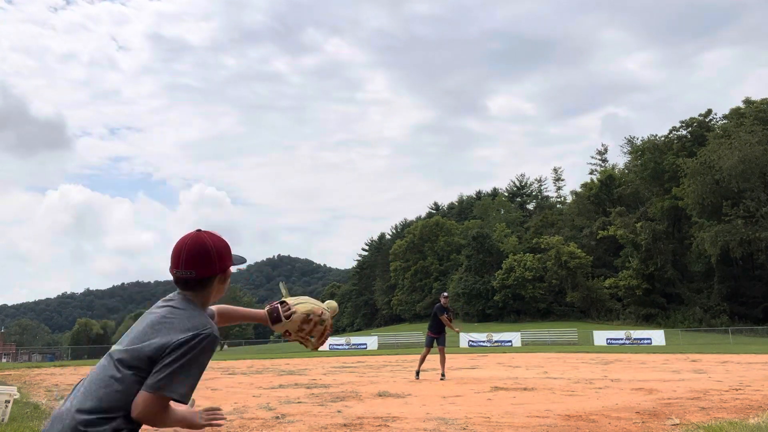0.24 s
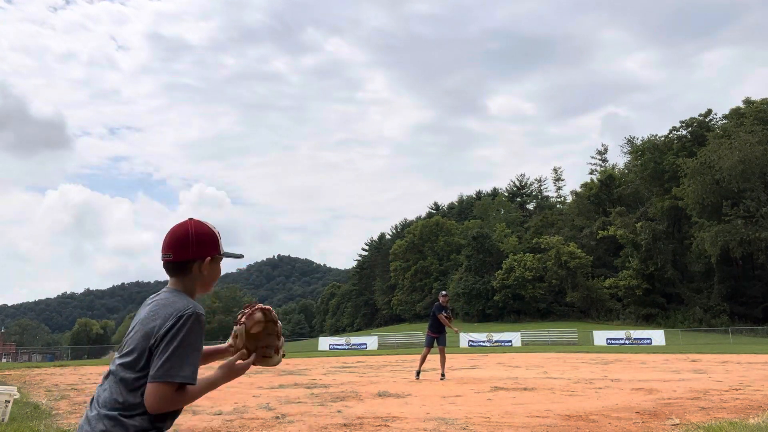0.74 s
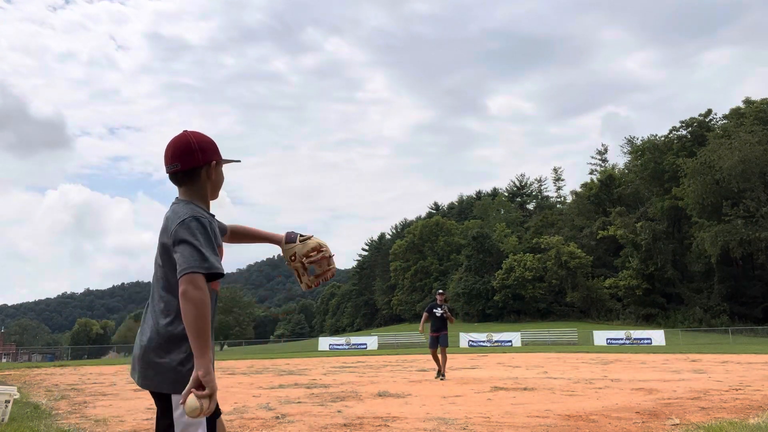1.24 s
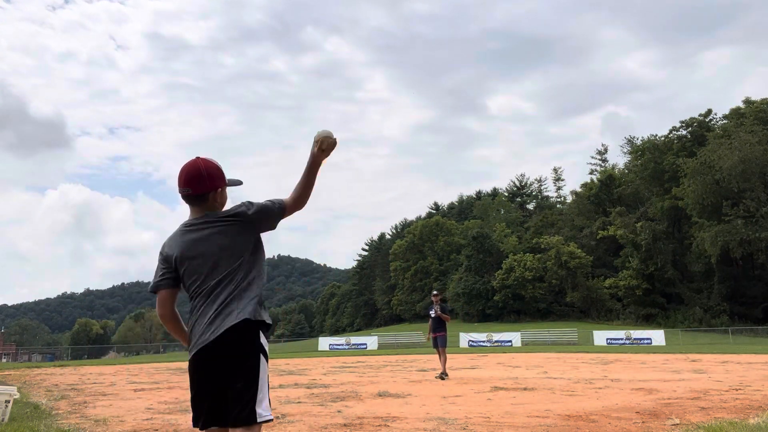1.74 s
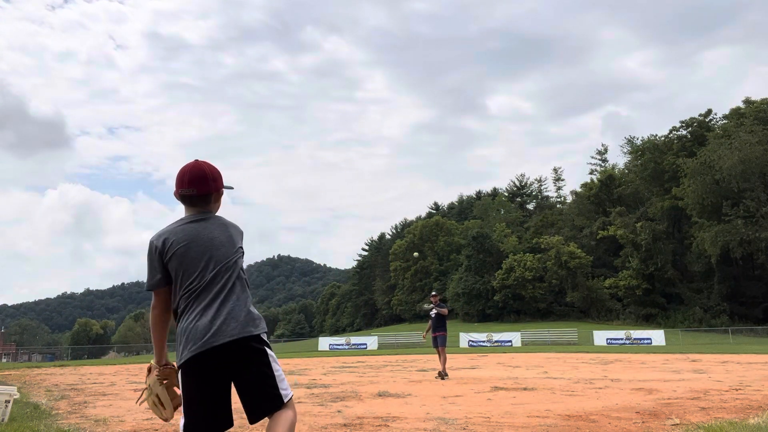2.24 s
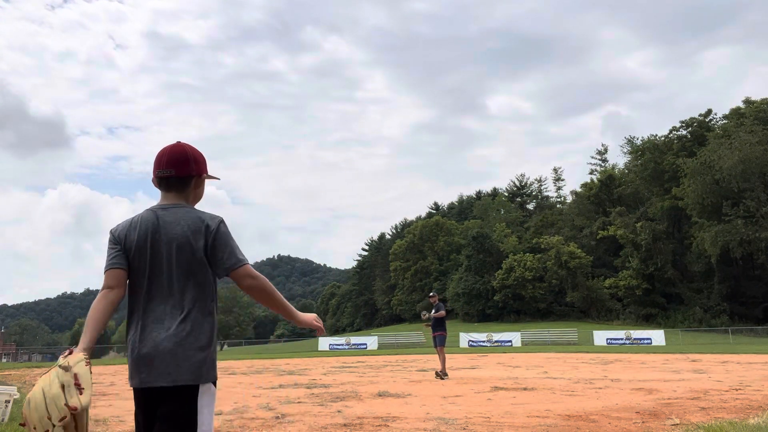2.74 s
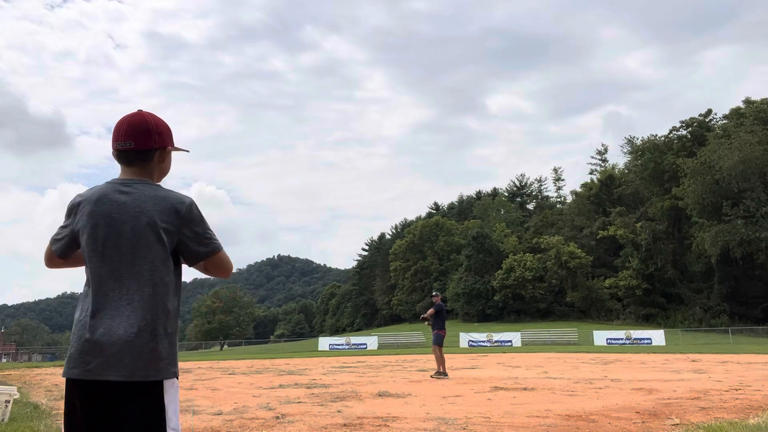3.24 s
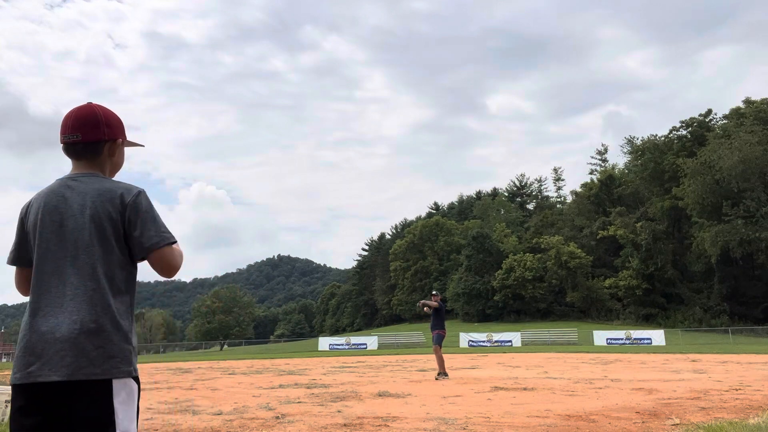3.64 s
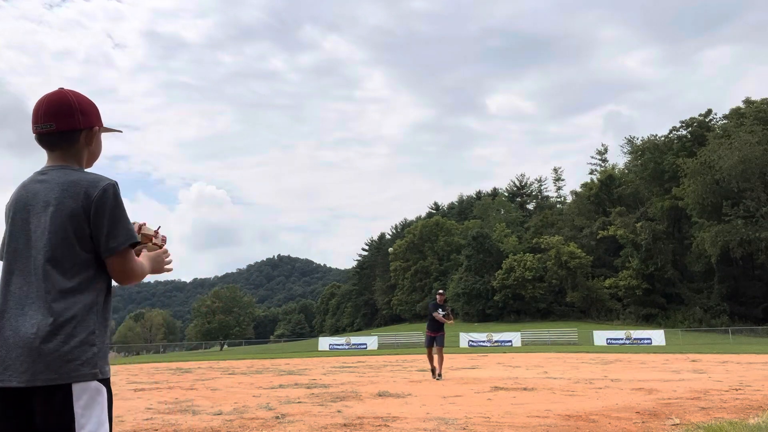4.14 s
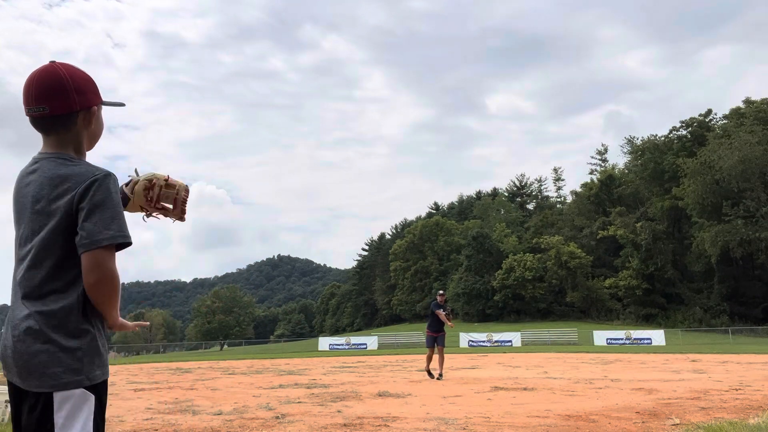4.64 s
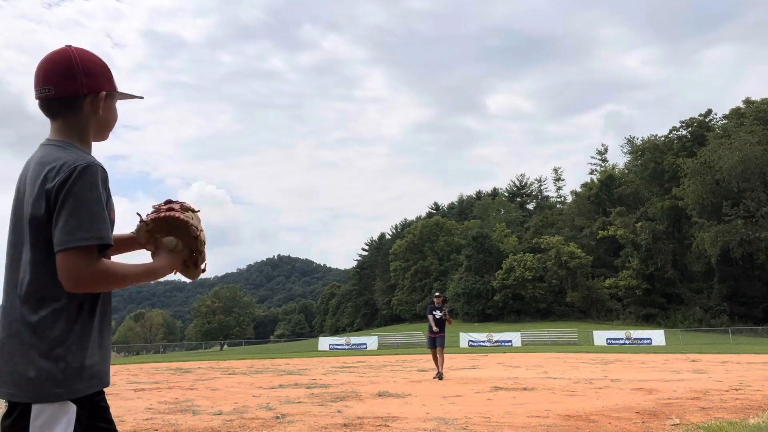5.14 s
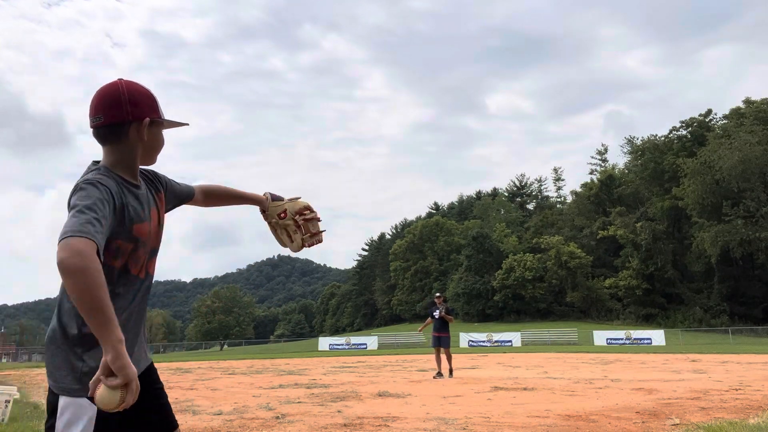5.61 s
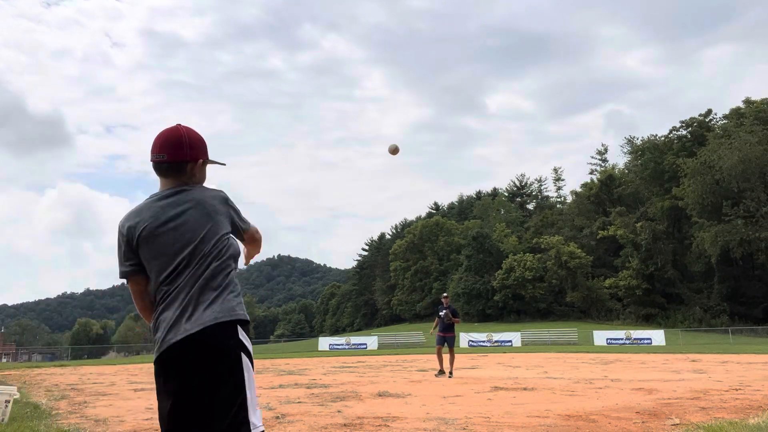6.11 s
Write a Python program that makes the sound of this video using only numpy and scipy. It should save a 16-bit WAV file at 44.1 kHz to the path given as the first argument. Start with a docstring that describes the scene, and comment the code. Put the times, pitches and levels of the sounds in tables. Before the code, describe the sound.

Close stereo pickup beside a player catching and throwing on an infield. A thick double-edged glove pop comes almost at once, then rustling, pebbly ticks and scuffs as the ball is taken out and thrown. A dry, slightly thinner pop follows, then quiet, then another sharp smack and more leather fumbling. Behind it are a low wavering motor hum, soft air hiss, a faint insect buzz, bird notes and a passing thin engine whine.

```python
"""Game of catch on a dirt infield

Three pops of a ball in a leather glove, with shoes scuffing, small knocks and leather creaking around them.
Each pop layers ringing leather, a sliding pocket note, a low thud, a noisy crack and a grainy flutter.
A far motor hums in wavering overtones and a small engine whines for a while above its faint idle.
Gliding tones make the birds, swelling noise an insect, and coloured noise the rumbling, hissing air.
The sound cuts out briefly twice near the start."""
import sys
import numpy as np
from scipy import signal
from scipy.fft import rfft, irfft, next_fast_len
from scipy.io import wavfile

SR = 44100
rng = np.random.default_rng(int(sys.argv[2]) if len(sys.argv) > 2 else 0)


def master_out(mix):
    """Clip the mix to full scale and print it as 16-bit PCM to the path in sys.argv[1]."""
    frames = np.transpose(np.atleast_2d(mix))
    ceiling = np.clip(frames, -1, 1)
    pcm = np.round(ceiling * 32767).astype(np.int16)
    wavfile.write(sys.argv[1], SR, pcm)


N = 280958
TIME = np.arange(N) / SR

# ringing modes of the near glove's leather, before each catch's tilt and damping: mode_hz, level_db, t60_s
NEAR_GLOVE = [(1040, 6.5, 0.01), (1295, 2.5, .014), (1717, -1, 0.011), (1980, -5, 0.011),
              (2717, -15, 0.022), (3220, -18, 0.033), (3750, -15, 0.016), (5240, -26.5, 0.0088),
              (6780, -17, 0.0087)]
# the same for the far glove: mode_hz, level_db, t60_s
FAR_GLOVE = [(1170, 0, 0.01), (1320, 0.5, 0.011), (1662, -11, 0.0079), (1890, -6, 0.014),
             (2040, -23, 0.017), (3500, -5.5, 0.0043), (3950, -18, 0.0065), (5750, -15, 0.0076),
             (7360, -21, 0.01)]
# spectrum of crunching dirt: pitch_hz, relative level_db per Hz
DIRT = [(120, -13), (300, 6.5), (550, 4), (1200, 4.5), (2000, -1), (3200, -15), (5000, -22.5), (8000, -41),
        (10000, -69), (15000, -56.5)]
# spectrum of fine grit: pitch_hz, relative level_db per Hz
GRIT = [(500, 14), (1100, 5.5), (2000, -2.5), (3500, 3), (5000, -4.5), (8000, -3), (10500, -34),
        (14500, -19.5), (16500, -27.5)]
# scuffs of shoes, cloth and leather: start_s, length_s, body_db, grit_db
SCUFFS = [(0.141, 0.047, -40, -50.5), (0.173, 0.039, -42.5, -53), (0.209, 0.026, -43, -59),
          (0.818, 0.03, -53, -50), (0.87, 0.058, -47.5, -61), (0.914, 0.035, -38, -44),
          (0.956, 0.018, -40.5, -51), (0.972, 0.024, -41.5, -49), (1.007, 0.017, -51, -54),
          (1.027, 0.048, -40, -56), (1.04, 0.016, -50, -52), (1.061, 0.06, -48.5, -47.5),
          (1.185, 0.03, -50, -61), (1.39, 0.04, -39.5, -48), (1.592, 0.11, -49, -44.5),
          (2.584, 0.1, -48.5, -55), (2.71, 0.045, -47, -61), (3.206, 0.037, -48.5, -65),
          (4.221, 0.13, -53, -81), (4.445, .1, -49.5, -63), (4.63, 0.11, -50.5, -55),
          (4.673, 0.013, -46, -53), (4.817, 0.13, -51.5, -58), (5.704, 0.033, -45.5, -53.5),
          (5.78, 0.089, -50, -53.5), (5.824, 0.013, -45, -55), (5.887, 0.088, -47, -54)]


def from_db(db):
    """Decibels to gain."""
    return 10 ** (np.asarray(db) / 20)


def rms_one(x):
    """Scale to unit power."""
    return x / np.sqrt(np.mean(x ** 2) + 1e-20)


def in_time(rows):
    """Interpolate each curve column at every sample."""
    s, *columns = np.transpose(rows)
    return [np.interp(TIME, s, column) for column in columns]


def colour(x, spectrum):
    """Give a steady signal a spectrum, rolled off beyond both ends; rms 1."""
    hz, db = np.transpose(spectrum)
    bins = np.maximum(np.fft.rfftfreq(len(x), 1 / SR), 1)
    beyond = np.minimum(bins / hz[0], 1) ** 2 * np.minimum(hz[-1] / bins, 1) ** 2
    gain = from_db(np.interp(np.log(bins), np.log(hz), db))
    return rms_one(irfft(rfft(x) * beyond * gain, len(x)))


def noise(spectrum):
    """Smooth coloured noise."""
    return colour(rng.standard_normal(next_fast_len(N)), spectrum)[:N]


def drift(rate_hz):
    """Chance curve with spread 1, taking a new random value rate_hz times a second."""
    knots = rng.standard_normal(16384)
    return rms_one(np.interp(TIME * rate_hz, np.arange(len(knots)), knots))


def grains(spectrum, per_s, spread_db):
    """Dense clicks of uneven size, coloured."""
    size = next_fast_len(N)
    clicks = (rng.random(size) < per_s / SR) * rng.standard_normal(size)
    uneven = from_db(spread_db * np.minimum(rng.exponential(1, size), 3))
    return colour(clicks * uneven, spectrum)[:N]


def burst(s, rise, fall, grip=1):
    """Samples of the next quarter second, time since the blow and its envelope; more grip ends it more abruptly."""
    span = slice(int(s * SR), min(int(s * SR) + SR // 4, N))
    t = np.maximum(TIME[span] - s, 0)
    return span, t, (1 - np.exp(-t / rise)) * np.exp(-(t / fall) ** grip)


def stereo(mid, side=0, pan_db=0):
    """Left and right from the shared part and the opposed part; positive pan leans left."""
    sign = np.array([[1], [-1]])
    return (mid + sign * side) * from_db(sign * pan_db / 2)


def widened(spectrum):
    """Spectrum of the opposed part of a near noise: the treble is widest."""
    # tilt added to the opposed part: pitch_hz, tilt_db
    width = [(200, -17), (1200, -11.5), (2400, -6.5), (4400, -3.5), (8000, 3), (15000, 10.5)]
    width_hz, width_db = np.transpose(width)
    return [(hz, db + np.interp(np.log(hz), np.log(width_hz), width_db)) for hz, db in spectrum]


def motor(waver_db=1.0, overtone_waver_db=1.0, wander_hz=0.518, lag_s=0.00095):
    """Only the lowest firing orders carry this far; the air makes them waver, and they reach the right ear later."""
    # firing rate: time_s, pitch_hz
    pitch = [(0.0, 63.5), (0.19, 65.5), (1.17, 65), (2.38, 62), (4.93, 60), (6.37, 59.5)]
    # level of the firing tone: time_s, level_db
    level = [(0.0, -39), (0.03, -42.5), (0.3, -42), (0.8, -43.5), (1.13, -39), (1.24, -58), (1.35, -44.5),
             (1.67, -41.5), (1.97, -51), (2.0, -38), (2.4, -37.5), (2.59, -31.5), (3.9, -33.5),
             (4.19, -39.5), (4.7, -37.5), (5.24, -32.5), (5.31, -37.5), (5.39, -33), (5.78, -29),
             (6.1, -38.5), (6.3, -40.5), (6.37, -44)]
    # common level of the overtones: time_s, level_db
    overtone_level = [(0, -64), (1.05, -51), (1.25, -64), (2.4, -50), (2.6, -47.5), (3.3, -43),
                      (3.9, -48.5), (4.9, -46), (5.7, -41), (6.37, -54.5)]
    # overtones: multiple of the firing rate, level_db against the common level
    orders = [(2, -1), (3, -10.5), (4, -16)]
    (hz,), (level_db,), (overtones_db,) = in_time(pitch), in_time(level), in_time(overtone_level)
    ear_delay = hz * lag_s * np.array([[0], [1]])
    turn = 2 * np.pi * (np.cumsum(hz + wander_hz * drift(11)) / SR - ear_delay)
    hum = np.sin(turn) * from_db(level_db + waver_db * drift(12))
    for k, db in orders:
        hum = hum + from_db(overtones_db + db + overtone_waver_db * drift(6)) * np.sin(k * turn)
    return stereo(np.sqrt(2) * hum, pan_db=-1.9)  # root two turns each sine's level into rms


def air(mid_db=-46.5, side_db=-51, breeze_db=1.0, wind_db=-54, gust_db=4):
    """Low rumble and a soft hiss with a narrow bright band; light gusts buffet each ear with its own noise."""
    # part alike at both ears: pitch_hz, relative level_db per Hz
    mid = [(25, 0), (55, 13), (105, 16), (170, 5.5), (330, -9.5), (800, -6.5), (1800, -11.5), (3000, -21),
           (4600, -23.5), (5500, -23), (6200, -25), (7100, -7), (8200, -27.5), (9500, -59)]
    # part opposed between the ears: pitch_hz, relative level_db per Hz
    side = [(25, -3.5), (70, 18.5), (170, 1), (380, -10), (850, 7.5), (1800, -3), (3000, -15), (4600, -14),
            (5500, -22.5), (6200, -15), (7100, 0), (8200, -17), (9500, -31), (15500, -37.5)]
    hiss = stereo(from_db(mid_db + breeze_db * drift(8.4)) * noise(mid), from_db(side_db) * noise(side))
    wind_spectrum = [(35, -10.5), (60, -0.5), (110, -11.0), (250, -13.5)]
    wind = np.array([noise(wind_spectrum) for _ in range(2)])
    return hiss + from_db(wind_db + gust_db * drift(9.9)) * wind


def whine(wander_hz=0.8, wander_per_rev=0.845, fade_db=4.0, rasp_db=-1):
    """A small far engine idles faintly, swells, dulls as it recedes and sinks back; its lines waver on the way."""
    # revving of the engine: time_s, pitch_hz
    revs = [(3.2, 429.3), (3.6, 429.6), (4.0, 435.4), (4.3, 443.4), (4.6, 446.2), (5.4, 434)]
    # sounding lines: multiple of the pitch, level_db at the start of the swell
    orders = [(2, -1), (3, -7), (4, -13.5), (5, -17.5), (6, -9)]
    # rough noise of the engine: pitch_hz, relative level_db per Hz
    rasp = [(500, -30), (850, 12.5), (1400, -5.5), (2600, -12), (4000, -36.5)]
    start_s, attack_s, end_s, release_s = 3.14, 0.15, 4.99, 0.22
    full_db, idle_db, recede_db_per_s = -57, -69.5, 1.5
    dulling_db_per_s = 2.5  # for each step up the overtones
    hz, = in_time(revs)
    running = np.maximum(TIME - start_s, 0)
    throttle = np.clip(running / attack_s, 0, 1) * np.exp(-np.maximum(TIME - end_s, 0) / release_s)
    # it runs less evenly at higher revs
    wander = (wander_hz + wander_per_rev * (hz - hz.min())) * drift(22)
    turn = 2 * np.pi * np.cumsum(hz + wander) / SR
    lines = np.zeros(N)
    for k, db in orders:
        dulling_db = dulling_db_per_s * (k - 2.5) * running
        lines += from_db(db - dulling_db + fade_db * drift(12)) * np.sin(k * turn)
    ears = np.array([lines + from_db(rasp_db) * noise(rasp) for _ in range(2)])
    swell_db = (full_db - recede_db_per_s * running - idle_db) * throttle
    return from_db(idle_db + swell_db) * ears


def coarse_grains(count=3, snap_db=-12):
    """Every firm scuff sets off a few small contacts at chance moments: rows shaped like the knocks in ticks()."""
    level_db, spread_db, low_hz, high_hz, length_s = -1, 7, 724, 3020, 0.0022
    firm_db = -53  # scuffs no louder than this shift no coarse grains
    rows = []
    for s, length, body_db, _ in SCUFFS:
        for when, size, pitch in rng.random((count, 3)):
            hz = low_hz * (high_hz / low_hz) ** pitch
            if body_db > firm_db:
                start = s + length * (0.092 + 0.73 * when)
                db = body_db + level_db + spread_db * (2 * size - 1)
                rows.append((start, db, hz, length_s, snap_db))
    return rows


def ticks(rise_s=0.00032, wobble=0.2):
    """Each small contact rings briefly at an unsteady pitch, with a dry snap."""
    # clearest knocks of leather, laces and pebbles: start_s, level_db, pitch_hz, length_s,
    # snap_db against the knock
    knocks = [(.101, -36.5, 595, 0.0047, -3), (.126, -33.5, 326, 0.0073, -13),
              (.152, -30, 550, 0.0035, -15), (.175, -30.5, 1210, 0.003, -16),
              (.19, -29.5, 1160, 0.0043, -5), (.214, -35, 440, .004, -15), (.875, -42, 806, 0.0042, -15),
              (.922, -33, 1810, .005, -10), (.941, -31, 620, 0.0071, -10), (.96, -35, 718, 0.0072, -12),
              (1.031, -30, 796, 0.0052, -14), (1.045, -26.5, 867, 0.0079, -12),
              (1.048, -29, 480, 0.0056, -11), (1.06, -30, 574, 0.0047, -6),
              (1.213, -36.5, 1140, 0.0032, -14), (1.399, -37, 1425, 0.0023, -1),
              (1.428, -40, 3040, 0.0018, -1), (1.51, -36, 1260, 0.0028, -14),
              (1.556, -30, 1090, 0.0018, -10), (1.762, -39, 1460, 0.0018, 3),
              (1.789, -32.5, 1550, 0.0017, -13), (2.5219, -14.5, 1350, 0.0023, 1),
              (2.958, -43.5, 1020, 0.0041, -11.5), (3.149, -44, 490, 0.0087, -12),
              (4.6365, -28.5, 750, 0.0028, -2), (4.854, -37.5, 1700, 0.0009, 0),
              (4.8815, -29.5, 1265, 0.0011, 0), (5.699, -33, 337, 0.0028, -9), (5.72, -36, 1050, 0.005, -8),
              (5.787, -39, 1800, 0.0036, -5), (5.828, -33, 1004, 0.006, -13),
              (5.902, -39, 1320, 0.0026, -5), (5.925, -47, 1460, 0.0059, -8), (5.945, -45, 1500, .0012, -2)]
    out = np.zeros((2, N))
    snap = stereo(0.26 * noise(DIRT) + 0.5 * noise(GRIT), 0.35 * noise(widened(GRIT)))
    unsteady = 1 + wobble * drift(1500)
    for s, db, hz, length, snap_db in list(knocks) + coarse_grains():
        span, t, fade = burst(s, rise_s, length)
        knock = np.sin(2 * np.pi * hz * np.cumsum(unsteady[span]) / SR)
        out[:, span] += from_db(db) * fade * (knock + from_db(snap_db) * snap[:, span])
    return out


def scuffs(body_width_db=-9, grit_width_db=-2, uneven_db=2.0):
    """Rubbing strokes swell quickly and fade: a dull crunch with fine grit on top."""
    body, grit = np.zeros(N), np.zeros(N)
    for s, length, body_db, grit_db in SCUFFS:
        span, t, stroke = burst(s, 0.15 * length, length, grip=1.6)
        body[span] += from_db(body_db) * stroke
        grit[span] += from_db(grit_db) * stroke
    crunch = stereo(grains(DIRT, 3000, 2.6), from_db(body_width_db) * grains(widened(DIRT), 5000, 3))
    sand = stereo(grains(GRIT, 3500, 0.78), from_db(grit_width_db) * grains(widened(GRIT), 3500, 2.5))
    return (body * crunch + grit * sand) * from_db(uneven_db * drift(130))


def insect(buzz_db=-70, first_s=0.26, every_s=1.52, length_s=1):
    """A narrow band of treble noise swells and fades at an even pace."""
    # spectrum of the buzz: pitch_hz, relative level_db per Hz
    buzz = [(4400, -24), (5200, 1), (5650, 0), (6100, -8), (6800, -35)]
    swell = np.sin(np.pi * np.clip((TIME - first_s) % every_s / length_s, 0, 1))
    return from_db(buzz_db) * swell * stereo(0.57 * noise(buzz), noise(buzz))


def catches(slap_rise_s=0.00074, thud_hz=100, thud_rise_s=0.0012, thud_fall_s=0.0073,
            flutter_rise_s=0.0072, flutter_fall_s=0.013, flutter_width_db=-7, web_t60_s=0.011):
    """The ball slaps the leather, squeezes the air from the pocket, and the glove flutters shut."""
    # ball meets glove, the first two rows making one pop: start_s, glove (its modes), slap_db,
    # palm_s (slap delay), pocket_db, crack_db, thud_db, flutter_db, close_s (flutter delay),
    # pocket_start_hz, pocket_end_hz, glide_s, swell_s, ring_s, contact_s (crack rise),
    # grip (how abruptly the ring is choked), bright_db per octave, damping (factor on leather decay),
    # web_hz, web_db, crack_width_db, pan_db (positive left), lag_s (right ear later)
    impacts = [(0.2983, NEAR_GLOVE, -16.5, 0.000088, -8, -14, -40, -21.5, .001, 504, 707, 0.0012, 0.0022, 0.005, 0.00044, 1.5, 3.5, 0.58, 3100, -11, -6, -0.5, 0.00001),
               (0.3073, NEAR_GLOVE, -8, .0014, -9.5, -8, -25, -26, 0.0048, 627, 668, 0.0013, 0.0014, 0.0089, 0.00097, 6.4, 6.5, 1.4, 1580, -7, -11, 1, 0.000012),
               (2.5231, FAR_GLOVE, -4, 0.000518, -5.5, -19, -28, -21.5, 0.0086, 1356, 55.6, 0.00406, 0.0043, 0.0095, 0.00054, 1.35, 3.4, 1.3, 1230, -24, 2, -0.5, 0.000089),
               (4.6154, NEAR_GLOVE, -2, 0.0000071, -7, -14, -29, -25, 0.0085, 4900, 461, 0.000362, 0.0014, 0.005, 0.0004, 3.1, 0.5, 1.46, 2700, -17, 0, 2.5, 0.00011)]
    # spectrum of the crack: pitch_hz, relative level_db per Hz
    crack_spectrum = [(500, 9.5), (1200, 9), (2100, 8), (2600, -20), (3400, 1), (4000, 3), (5200, 2),
                      (7500, 1), (9000, -11), (11000, -24.5), (14500, -5.5), (16500, -18)]
    # spectrum of the closing flutter: pitch_hz, relative level_db per Hz
    flutter_spectrum = [(60, 4.5), (150, 7.5), (400, 0.5), (1200, -7.5), (2200, -13), (4000, -23),
                        (7500, -26), (10000, -43.5), (15000, -51)]
    out = np.zeros((2, N))
    crack, crack_side = noise(crack_spectrum), noise(widened(crack_spectrum))
    flutter_side = from_db(flutter_width_db) * grains(widened(flutter_spectrum), 6000, 2)
    flutter = stereo(grains(flutter_spectrum, 6600, 0.53), flutter_side)
    for (s, glove, slap_db, palm, pocket_db, crack_db, thud_db, flutter_db, close, start_hz, end_hz,
         glide, swell, ring, contact, grip, bright_db, damping, web_hz, web_db, width_db,
         pan_db, lag) in impacts:
        # the pocket's note slides as the leather gives, and the closing hand chokes it
        span, t, squeeze = burst(s, swell, ring, grip)
        hz = end_hz + (start_hz - end_hz) * np.exp(-t / glide)
        pocket = from_db(pocket_db) * squeeze * np.sin(2 * np.pi * np.cumsum(hz) / SR)
        # the slap rings in the leather, tilted brighter above its lowest mode
        since = np.maximum(t - palm, 0)
        modes = np.zeros(len(t))
        for mode_hz, db, t60 in glove:
            tilt_db = bright_db * np.log2(mode_hz / glove[0][0])
            decay_db = 60 * damping * since / t60
            modes += from_db(db + tilt_db - decay_db) * np.sin(2 * np.pi * mode_hz * since)
        # the taut web adds a note of its own
        web = from_db(web_db - 60 * since / web_t60_s) * np.sin(2 * np.pi * web_hz * since)
        slap = (1 - np.exp(-since / slap_rise_s)) * (from_db(slap_db) * modes + web)
        # the whole glove recoils with a low thud
        recoil = burst(s, thud_rise_s, thud_fall_s)[2]
        thud = from_db(thud_db) * recoil * np.sin(2 * np.pi * thud_hz * t)
        pop = pocket + slap + thud
        out[:, span] += stereo(np.array([pop, np.interp(t - lag, t, pop)]), pan_db=pan_db)
        snap = burst(s, contact, 2.64 * contact, grip=1.1)[2]
        crack_pair = stereo(crack[span], from_db(width_db) * crack_side[span])
        out[:, span] += from_db(crack_db) * snap * crack_pair
        # the fingers close
        span, t, closing = burst(s + close, flutter_rise_s, flutter_fall_s)
        out[:, span] += from_db(flutter_db) * closing * flutter[:, span]
    return out


def birds(note_s=0.039, note_change=0.02):
    """A bird repeats a faint note rising through three pitches, shifted a little by chance each time."""
    # bird notes: start_s, level_db
    notes = [(.458, -58), (2.289, -59), (2.74, -63.5), (3.0, -68), (5.11, -62), (5.38, -64), (6.031, -73),
             (6.3, -66)]
    song = np.zeros(N)
    for s, db in notes:
        span, t, note = burst(s, 0.1 * note_s, note_s, grip=8.9)
        hz = np.interp(t / note_s, [0, 0.5, 1], [3750, 4120, 4280])
        hz = hz * (1 + note_change * rng.standard_normal())
        song[span] += from_db(db) * note * np.sin(2 * np.pi * np.cumsum(hz) / SR)
    return stereo(0.38 * song, song)


def creaks(wobble=0.14, rough_db=3):
    """Leather sticks and slips: a short unsteady note that slides in pitch, roughened in level."""
    # drags of the leather: start_s, length_s, level_db, start_hz, end_hz
    drags = [(1.089, 0.027, -36, 1047, 1180), (5.653, 0.0061, -40, 1307, 1160),
             (5.662, 0.012, -35.5, 1130, 1260), (5.681, 0.01, -37.5, 930, 810)]
    out = np.zeros(N)
    unsteady = 1 + wobble * drift(900)
    for s, length, db, start_hz, end_hz in drags:
        span, t, drag = burst(s, 0.25 * length, length, grip=1.6)
        hz = np.interp(t, [0, length], [start_hz, end_hz]) * unsteady[span]
        out[span] += from_db(db) * drag * np.sin(2 * np.pi * np.cumsum(hz) / SR)
    return stereo(out * from_db(rough_db * drift(250)))


def whistle(level_db=-69.5):
    """Another bird gives one long whistle: a pure tone that swoops down and rises a little as it fades."""
    # pitch of the whistle: time_s, pitch_hz
    swoop = [(3.86, 6140), (3.919, 5500), (4.0, 5280), (4.12, 5500)]
    hz, = in_time(swoop)
    start, end = swoop[0][0], swoop[-1][0]
    swell = np.sin(np.pi * np.clip((TIME - start) / (end - start), 0, 1))
    song = from_db(level_db) * swell * np.sin(2 * np.pi * np.cumsum(hz) / SR)
    return stereo(0.38 * song, song)


def scene():
    """The players in front of the far sounds."""
    players = catches() + scuffs() + ticks() + creaks()
    return players + motor() + whine() + birds() + whistle() + insect() + air()


def record(dry, edge_s=0.0061, ceiling=1.3, stopband_hz=17300):
    """The sound cuts out twice, peaks are rounded and the top is cut."""
    # brief silences, with their fades inside: start_s, length_s
    dropouts = [(0.008, 0.023), (0.052, 0.02)]
    gate = np.ones(N)
    for s, length in dropouts:
        outside = abs(TIME - s - length / 2) - length / 2
        gate *= np.clip(outside / edge_s + 1, 0, 1)
    rounded = ceiling * np.tanh(gate * dry / ceiling)
    low_pass = signal.cheby2(14, 70, stopband_hz, fs=SR, output="sos")
    return signal.sosfilt(low_pass, rounded)


dry = scene()
out = record(dry)
master_out(out)
```